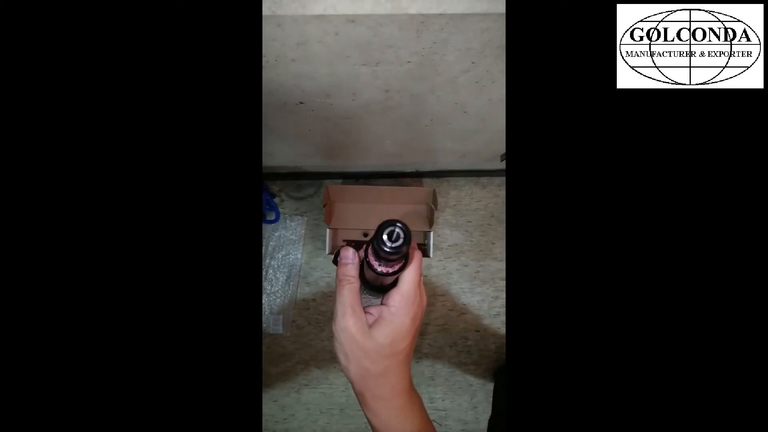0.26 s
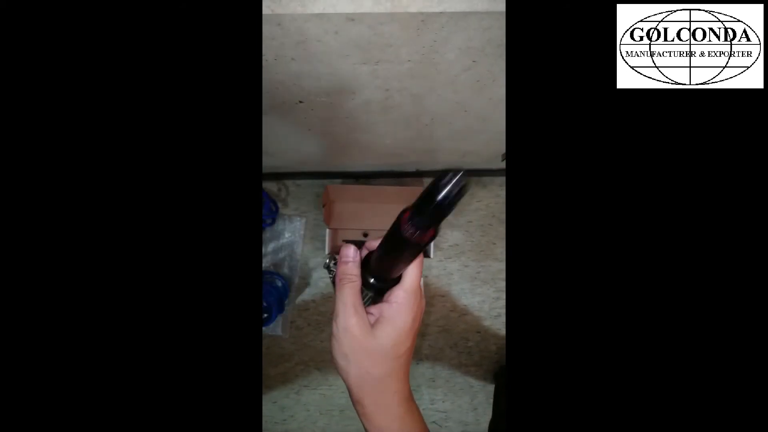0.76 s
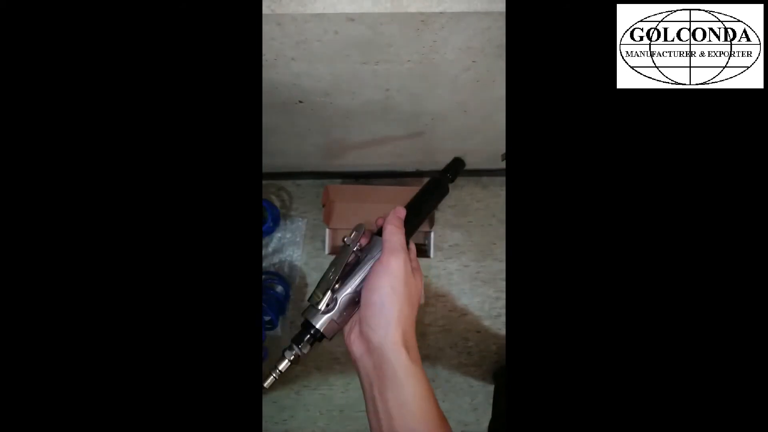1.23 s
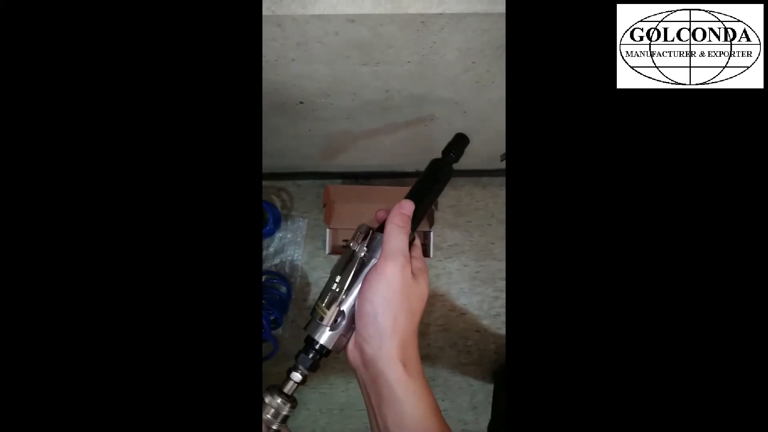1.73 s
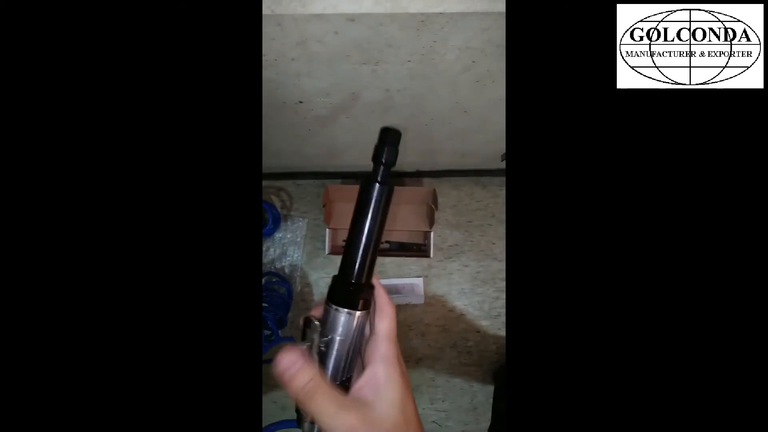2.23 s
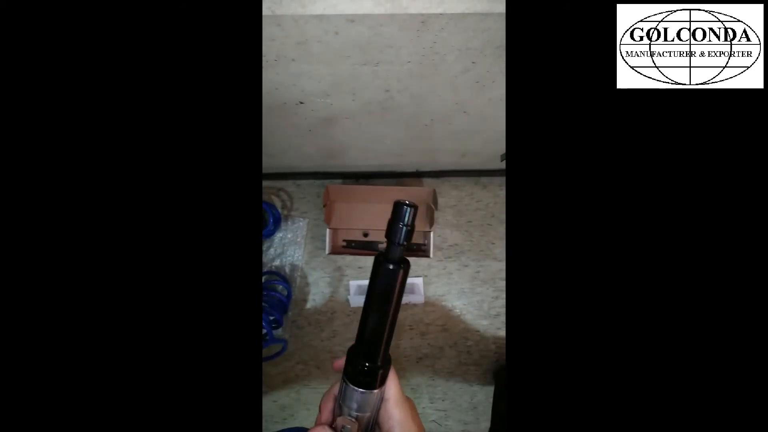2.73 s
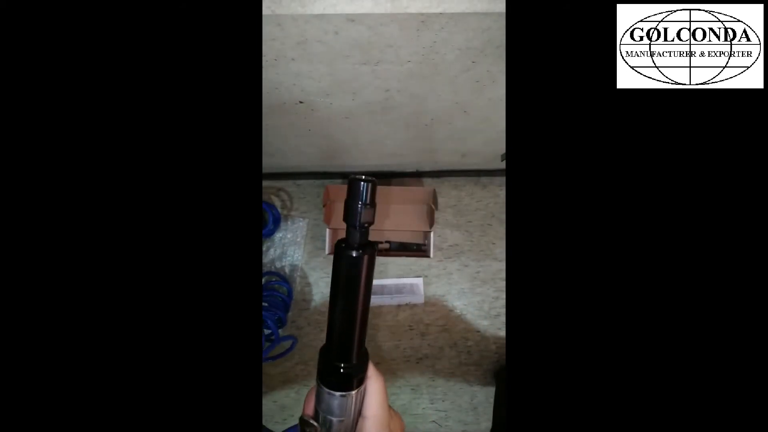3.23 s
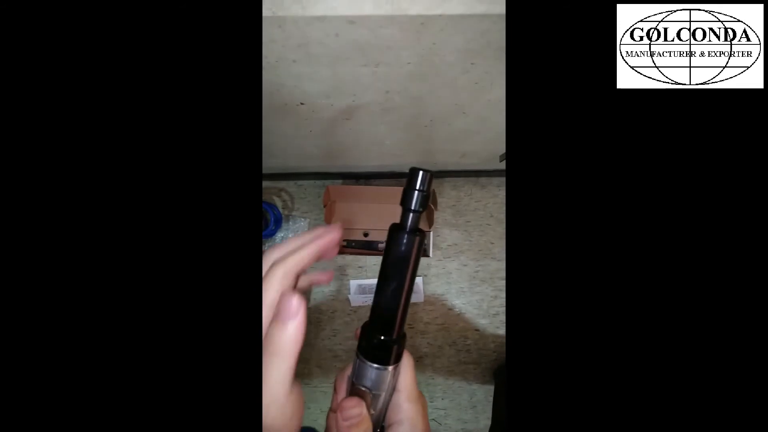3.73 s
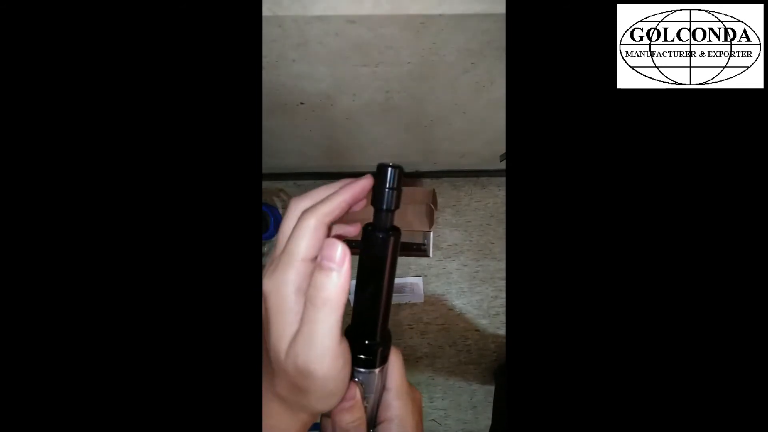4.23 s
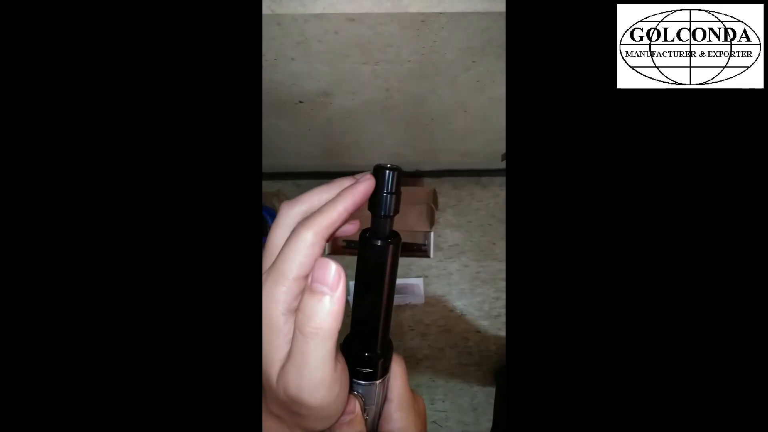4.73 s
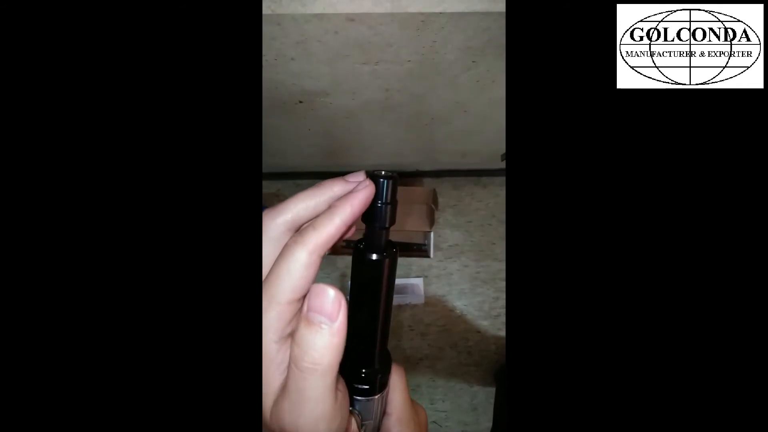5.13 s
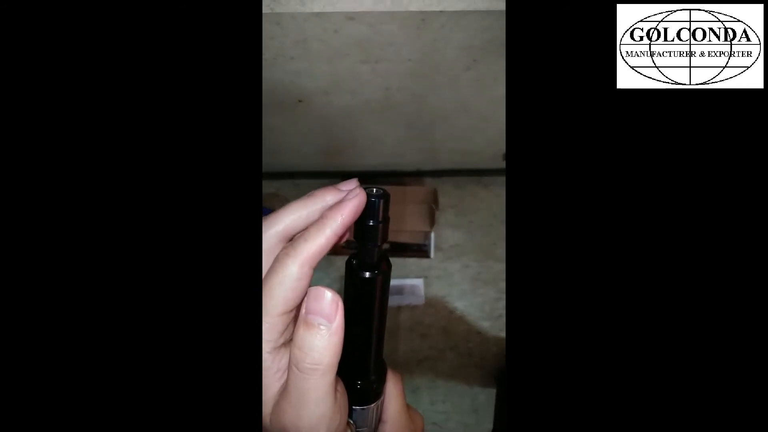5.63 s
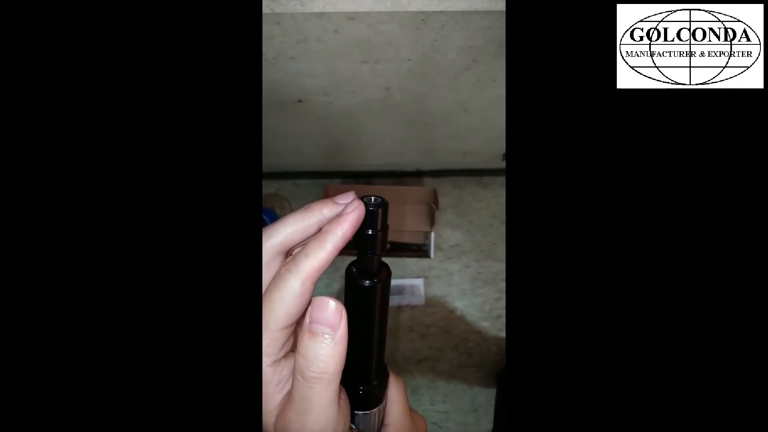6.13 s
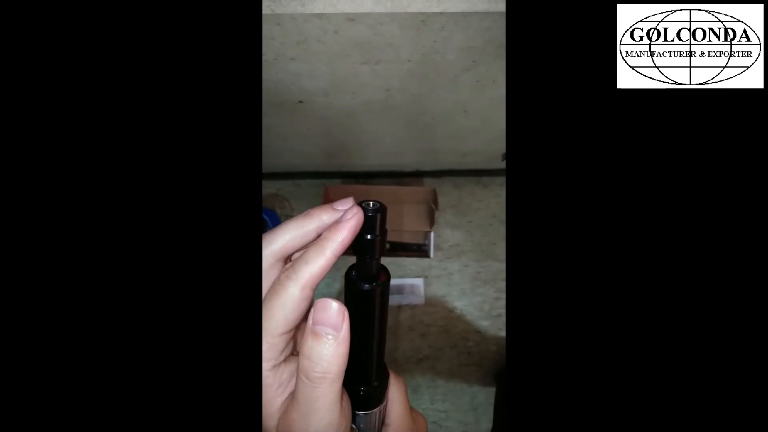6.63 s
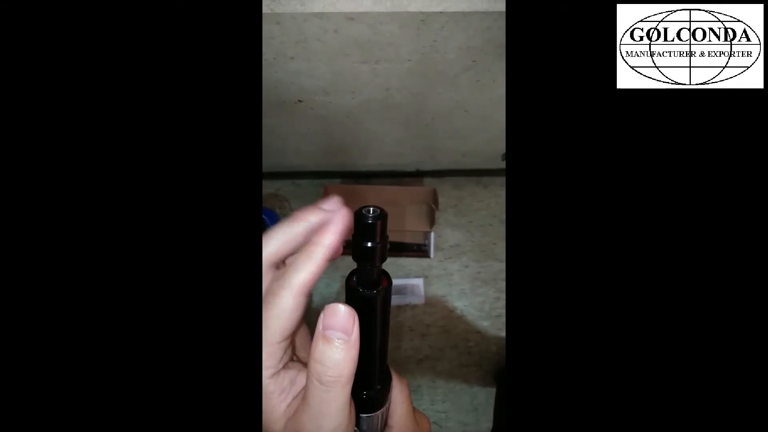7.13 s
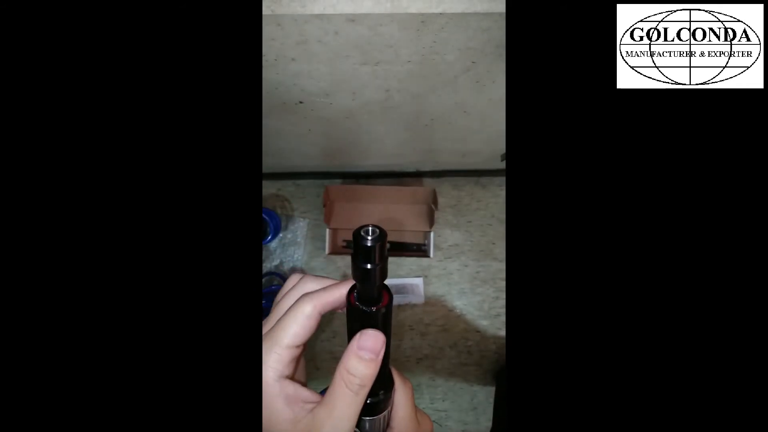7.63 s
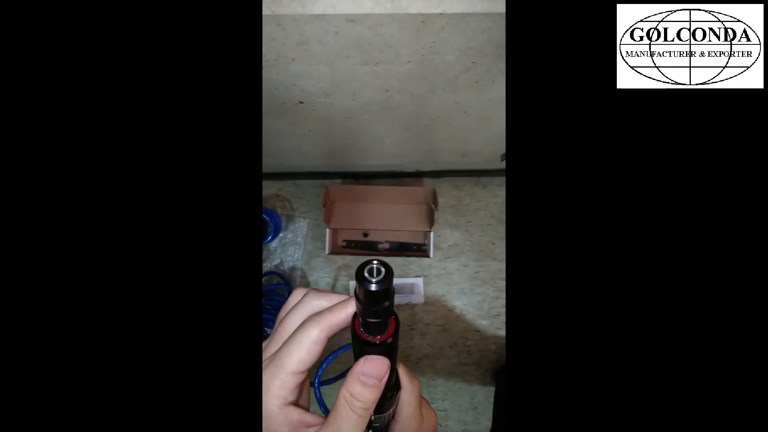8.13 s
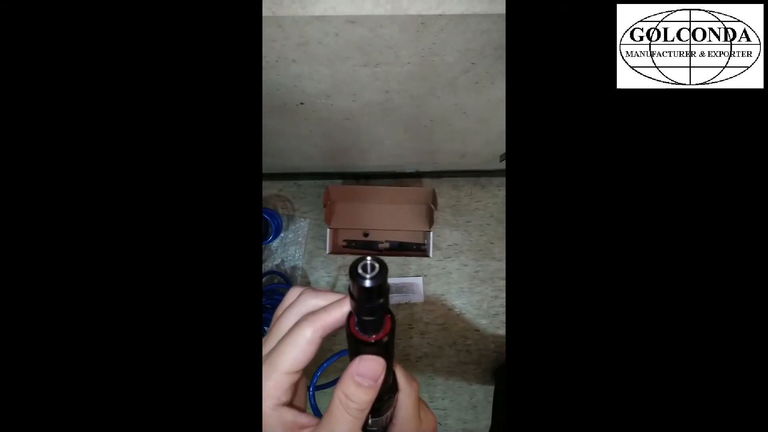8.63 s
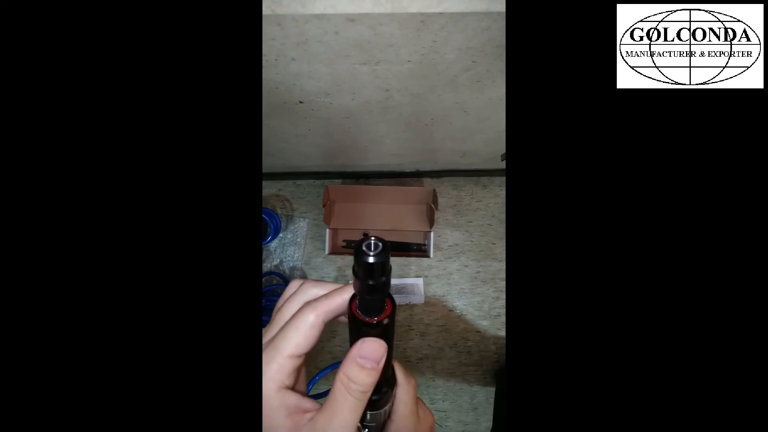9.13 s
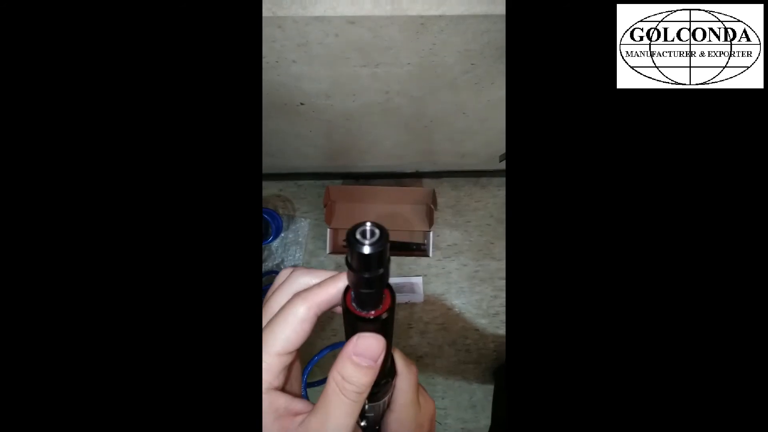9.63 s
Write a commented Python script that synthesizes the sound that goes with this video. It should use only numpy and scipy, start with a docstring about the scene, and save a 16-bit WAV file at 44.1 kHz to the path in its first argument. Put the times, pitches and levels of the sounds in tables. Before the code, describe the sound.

Close stereo pickup in a small, softly humming workshop. A steel air coupling scrapes and clicks while thin air hisses and squeals, then a brief blast vents as it seats. Smaller handling clicks and faint whistles follow. At about four seconds an air grinder puffs, races up within a fraction of a second and runs on with a wavering whine and strong exhaust hiss, mostly on the right.

```python
"""A small workshop with a low hum, an air hose and a die grinder close to two microphones.
A thin leak of air hisses, the coupling scrapes, clicks and squeals, then seats with a blast of air.
As the tool is turned, more slides, clicks and thin whistles follow: noise, struck resonances, gliding sines.
Then the throttle opens: exhaust hiss blows to the right, coloured noise pulsed by the vanes,
and a four-vane motor puffs, spins up and whines, its tones all locked to one shaft angle."""
import sys
import numpy as np
from scipy import signal
from scipy.fft import rfft, irfft, next_fast_len
from scipy.io import wavfile
from scipy.ndimage import uniform_filter1d

SR = 44100
rng = np.random.default_rng(int(sys.argv[2]) if len(sys.argv) > 2 else 0)


def unload_audio(sound):
    """Save the sound as a 16-bit wav file, at the path given as the first command line argument."""
    columns = np.transpose(np.atleast_2d(sound))
    # keep every value between -1 and 1, then stretch to whole-number steps
    steps = np.round(np.clip(columns, -1, 1) * 32767)
    wavfile.write(sys.argv[1], SR, steps.astype(np.int16))


N = 435266
T = np.arange(N) / SR


def amp(db):
    """Decibels to gain."""
    return 10 ** (np.asarray(db) / 20)


def unit(x):
    """Scales to rms 1."""
    return x / np.sqrt(np.mean(x ** 2) + 1e-20)


def curves(rows):
    """Each column of a timed table, sample by sample."""
    times, *columns = np.transpose(rows)
    return [np.interp(T, times, column) for column in columns]


def read(rows, hz):
    """Each column of a spectrum table at the given frequencies, on a log frequency axis."""
    table_hz, *columns = np.transpose(rows)
    return np.array([np.interp(np.log(hz + 1), np.log(table_hz + 1), column) for column in columns])


def drift(hz, count=1):
    """Slow random movement of rms 1, up to about hz."""
    step = 64  # samples between knots
    knots = rng.standard_normal((count, N // step + 2))
    lowpass = signal.butter(2, min(hz, SR / 256), fs=SR / step, output="sos")
    slow = signal.sosfilt(lowpass, knots)
    return np.array([np.interp(np.arange(N) / step, np.arange(len(k)), unit(k)) for k in slow])


def smooth_filter(x, order, hz, kind="low"):
    """Butterworth filter run once, forwards in time."""
    return signal.sosfilt(signal.butter(order, hz, kind, fs=SR, output="sos"), x)


def lowpass_in_step(x, hz):
    """Low-pass run both ways, so that the result stays in phase with its source."""
    return signal.sosfiltfilt(signal.butter(2, hz, fs=SR, output="sos"), x)


def air(colour, same_low, same_high):
    """Turbulent noise at two microphones, with their likeness below 9 kHz and above 11.8 kHz."""
    size = next_fast_len(N)
    hz = np.fft.rfftfreq(size, 1 / SR)
    a, b = rfft(rng.standard_normal((2, size)))
    same = np.clip(np.interp(hz, [9000, 11800], [same_low, same_high]), -1, 1)
    pair = np.array([same * a + np.sqrt(1 - same ** 2) * b, a])
    return irfft(pair * amp(read(colour, hz)), size)[:, :N]


def resonate(x, hz, width):
    """A damped resonance of gain 1 at its centre; the width is in Hz."""
    r = np.exp(-np.pi * width / SR)
    pole = r * np.exp(2j * np.pi * hz / SR)
    return 2 * signal.lfilter([1 - r], [1, -pole], x + 1e-18).real


# Decay of the workshop: (frequency [Hz], time to fall by 60 dB [s])
ROOM_DECAY = [(200, 0.067), (2000, 0.33), (8000, 0.19), (15000, 0.23)]


def room(x):
    """Dense reflections of the workshop: the bass dies first and the middle rings longest."""
    taps = rng.standard_normal((2, SR // 2))
    hz, t, z = signal.stft(taps, SR, nperseg=256)
    tail = signal.istft(z * amp(-60 * t / read(ROOM_DECAY, hz).T), SR, nperseg=256)[1]
    tail *= np.clip(T[:tail.shape[1]] / 0.002 - 1, 0, 1)  # silent for 2 ms, full at 4 ms
    return signal.oaconvolve(x, tail / np.linalg.norm(tail[0]), axes=1)[:, :N]


# Colour of the workshop's room noise: (frequency [Hz], left level [dB], right level [dB])
ROOM_TONE = [(22, -58, -51), (50, -42, -35), (85, -31, -24), (120, -32, -25), (170, -28, -21),
             (240, -35, -26), (310, -38, -31), (500, -44, -34), (1000, -49, -41.5), (1700, -55, -46.5),
             (2200, -76, -54), (3000, -84, -70), (6000, -88, -81), (15000, -95, -78)]
# Two distant machines hum almost in tune; their tones add up at the crest
HUM_HZ, HUM_CREST_S = (680.75, 682.38), 0.43


def workshop(hum_db=-58, room_db=1):
    """Low room noise with two faint machine tones, so close in pitch that they beat slowly."""
    hum = sum(np.cos(2 * np.pi * hz * (T - HUM_CREST_S)) for hz in HUM_HZ)
    hum = hum * amp(hum_db + 1.2 * drift(2.2)[0])
    noise = air(ROOM_TONE, 0.35, .3) * amp(room_db + .5 * drift(7)[0])
    return noise + hum * amp([[-14], [0]])


# Flow of the leak at the coupling: (time [s], level [dB])
LEAK_FLOW = [(0.1, -54), (0.3, -64), (0.68, -68), (0.85, -51), (1.55, -57), (2.05, -41.5), (2.35, -60),
             (2.7, -68.5), (3.95, -74.5)]
# Colour of the leak at the microphones: (frequency [Hz], left level [dB], right level [dB])
LEAK_COLOUR = [(2000, -48.5, -34.5), (7100, -41.5, -14), (11000, -21.5, 9.5), (11800, -17, 1.5),
               (15500, -21, -12.5)]
# Squeals of the leak, one curve each: (time [s], pitch [Hz], level [dB])
SQUEAL_SEATING = [(1.08, 11600, -45), (1.16, 11500, -46), (1.24, 11500, -44), (1.29, 12800, -46),
                  (1.36, 12450, -42), (1.42, 12150, -41), (1.49, 12050, -44), (1.56, 10900, -46),
                  (1.64, 10400, -43)]
SQUEAL_CHIRP = [(1.33, 5050, -64), (1.39, 5130, -56), (1.44, 5440, -61.5)]
SQUEAL_TURNING = [(3.39, 9400, -58), (3.46, 10870, -54), (3.52, 12100, -50), (3.6, 10800, -53.5),
                  (3.7, 9350, -55), (3.75, 9140, -61)]
SQUEAL_LAST = [(3.85, 3930, -64), (3.885, 4250, -67), (3.92, 4230, -70)]
# Partials that glide together in a squeal: (ratio to its pitch [1], level [dB])
PARTIALS_SEATING = [(1, 1), (1.115, -9)]
PARTIALS_TURNING = [(0.27, -21), (0.36, -22), (0.527, -8), (0.67, -17), (1, -3), (1.1, -9), (1.2, -1),
                    (1.34, 0), (1.6, -2)]
PARTIALS_LAST = [(1, 1), (1.09, 0.55)]


def leak(whistle_db=-1, puff_db=0):
    """A thread of air hisses at the coupling and squeals as the gap shifts."""
    tone, hiss = (
        squeal(SQUEAL_SEATING, PARTIALS_SEATING, hiss_db=-16, waver=0.002)
        + squeal(SQUEAL_CHIRP, [(0.97, 0)], hiss_db=-20, waver=0.008)
        + squeal(SQUEAL_TURNING, PARTIALS_TURNING, hiss_db=-2, waver=0.013, flutter=0.56, fading_db=5)
        + squeal(SQUEAL_LAST, PARTIALS_LAST, hiss_db=-12.0, waver=0.0152))
    whistle = amp(whistle_db) * tone * amp([[-7], [0]])
    flow = amp(curves(LEAK_FLOW)[0]) + amp(puff_db) * sliding()[1] + hiss
    noise = air(LEAK_COLOUR, .3, 0.53) * flow * amp(1.3 * drift(30)[0])
    return whistle + .5 * room(whistle) + noise


# The sleeve slides on the plug and lets out a puff:
# (time of peak [s], scrape level [dB], puff level [dB], rise time [s], fall time [s])
SCRAPES = [(0.475, -55.5, -48, 0.017, 0.042), (0.767, -33.5, -34, 0.02, 0.022),
           (0.85, -44, -60, 0.03, 0.04), (0.925, -44, -63, 0.045, 0.074), (1.2, -46, -54, 0.049, 0.054),
           (1.699, -12.5, -38, 0.021, 0.011), (2.133, -32, -53, 0.012, 0.01),
           (2.24, -50, -66, 0.0304, 0.053), (2.48, -55, -57, 0.029, 0.064), (2.94, -65, -55, 0.0097, 0.033),
           (3.09, -52, -70, 0.015, 0.085), (3.285, -58, -77, 0.018, 0.027),
           (3.455, -55, -57.5, 0.022, 0.07), (3.775, -59, -66, 0.015, 0.037)]


def sliding():
    """Strength of the scrape and of the puff of air: each slide swells to its peak and dies away."""
    scrape, puff = np.zeros((2, N))
    for s, scrape_db, puff_db, rise_s, fall_s in SCRAPES:
        swell = np.exp(-np.maximum((s - T) / rise_s, (T - s) / fall_s))
        scrape += amp(scrape_db) * swell
        puff += amp(puff_db) * swell
    return scrape, puff


# Metal clicks of coupling and lever:
# (time [s], level [dB], dullness [0-1], rattle time [s], ring of the struck spot [Hz])
CLICKS = [(1.034, -12.5, 0.21, 0.0033, 8900), (1.055, -24, 0.27, 0.003, 6200),
          (1.281, -13.5, 0.3, 0.002, 7900), (1.283, -5.5, 0.21, 0.0012, 11900),
          (1.5313, -20.5, 0.65, 0.0073, 4250), (1.54, -30, 1, 0.0089, 1150),
          (1.665, -12.5, 0.43, .0015, 11600), (1.681, -9, 0.6, 0.0013, 4400),
          (1.697, -8, 0.15, 0.0033, 7900), (1.9556, -8.5, 0.24, 0.0013, 11500),
          (2.132, -30, 1, 0.0072, 2140), (2.2427, -23.5, 0.3, 0.00065, 4330),
          (2.485, -36, 0.33, 0.0055, 10400), (2.936, -56.5, .4, 0.0034, 10400),
          (3.076, -36, 0.9, 0.0026, 4270), (3.1537, -38.5, 0.4, 0.0055, 7000)]
# Modes of the coupling: (frequency [Hz], width [Hz], level [dB])
COUPLING_MODES = [(900, 550, -3.5), (1510, 490, 3.5), (2190, 670, 7.5), (3090, 1450, 8.5), (4550, 1100, 9),
                  (5900, 790, -1), (7730, 740, 3.5), (8800, 760, 2), (10160, 130, 7.5), (10500, 210, 3),
                  (11600, 1200, 3), (14350, 1800, -6.5)]


def coupling(click_db=1, scrape_db=0, grain_db=4, spot_gain=1.8, spot_width_hz=170):
    """Short rattles and gritty sliding ring the steel coupling; dull knocks reach its low modes."""
    grit = amp(scrape_db + grain_db * drift(140)[0])
    scrape = sliding()[0] * grit * rng.standard_normal(N)
    bright, dull = scrape.copy(), 0.35 * scrape
    t = T[:SR // 16]
    for s, db, dullness, rattle_s, spot_hz in CLICKS:
        blow = amp(db + click_db) * np.exp(-t / rattle_s) * rng.standard_normal(len(t))
        blow = blow + spot_gain * resonate(blow, spot_hz, spot_width_hz)
        at = slice(round(s * SR), round(s * SR) + len(t))
        bright[at] += blow
        dull[at] += dullness * blow
    ring = np.zeros(N)
    for k, (hz, width, db) in enumerate(COUPLING_MODES):
        drive = dull if hz < 5000 else bright
        ring += (-1) ** k * amp(db) * resonate(drive, hz, width)  # neighbours in opposite phase
    ring = smooth_filter(ring, 2, 450, "high")
    return ring * amp([[-24], [0]]) + room(ring * amp([[-13], [-6]]))


def squeal(rows, partials, hiss_db, waver, flutter=0.3, fading_db=2.0):
    """Unsteady partials of the gap glide together; gives the tone and the strength of its hiss."""
    hz, db = uniform_filter1d(np.array(curves(rows)), size=1800, axis=1)
    start_s, end_s = rows[0][0], rows[-1][0]
    level = amp(db) * np.clip(np.minimum(T - start_s, end_s - T) / .012, 0, 1)
    tone = np.zeros(N)
    for ratio, partial_db in partials:
        pitch_gust, level_gust = drift(170, count=2)
        strength = amp(partial_db + fading_db * drift(14)[0]) * (0.5 + flutter * level_gust)
        turns = np.cumsum(ratio * hz * (1 + waver * pitch_gust)) / SR
        tone += strength * np.sin(2 * np.pi * turns)
    return level * np.array([tone, np.full(N, amp(hiss_db))])


# Air escaping while the plug seats: (time [s], rush level [dB], hiss level [dB])
SEATING = [(1.794, -64, -59), (1.802, -4.5, 1.5), (1.85, -2, 2.5), (1.895, -2, 2), (1.92, -26.5, 3.5),
           (1.95, -23, -6), (2.0, -32, -16), (2.08, -60, -53)]
# Colour of the blast at the microphones: (frequency [Hz], left level [dB], right level [dB])
BLAST_COLOUR = [(39.8, -43.5, -23), (150.6, -39, -13.5), (407, -43, -13.5), (900, -42, -13.5),
                (2000, -32.5, -14.5), (4500, -28, -16), (7500, -27.5, -16.5), (9940, -31, -12.5),
                (11800, -12, -7.5), (15370, -21.5, -20.5)]


def seating_blast():
    """Line pressure vents past the plug until the seal closes; the low rush stops before the hiss."""
    rush_db, hiss_db = curves(SEATING)
    noise = air(BLAST_COLOUR, .1, 0.87)
    rush = lowpass_in_step(noise, 7000)
    hiss = noise - rush
    venting = (T > SEATING[0][0]) * (T < SEATING[-1][0])
    return (rush * amp(rush_db) + hiss * amp(hiss_db)) * venting


THROTTLE_S = 4.025
VANE_HZ = 1358  # vane passages per second, before overspeed and wander
# Pressure stored in the hose overspeeds the rotor, holds briefly, then drains away
OVERSPEED_HZ, HOLD_S, DRAIN_S = 167, 0.333, 0.55
HOUSING_HZ, HOUSING_WIDTH_HZ = 3440, 700  # resonance of the motor housing


def spin():
    """Share of full speed: the rotor breaks loose, races up and levels off."""
    return np.tanh((np.maximum(T - THROTTLE_S, 0) / .103) ** 1.12)


def surplus():
    """Share of the hose's stored pressure that is still left."""
    return np.exp(-np.maximum(T - THROTTLE_S - HOLD_S, 0) / DRAIN_S)


# Slow wander of the vane rate: (time [s], offset [Hz])
WANDER = [(4.36, 2), (4.8, 0), (4.98, -7), (5.59, 4), (6.54, -5), (7.08, -1), (7.41, 13), (8.17, 3),
          (9.08, 1), (9.15, -5.5)]


def shaft_turns(jitter=0.00136, stumble=0.0601):
    """Shaft angle in turns; four vanes pass the port in each, unevenly until flung out to seal."""
    full_hz = VANE_HZ + OVERSPEED_HZ * surplus() + curves(WANDER)[0]
    unevenness = jitter * drift(30.2)[0] + stumble * (1 - spin() ** 2) * drift(140)[0]
    vane_hz = full_hz * spin() * (1 + unevenness)
    return np.cumsum(vane_hz) / 4 / SR


# How far the hiss swells and sinks in patches: (frequency [Hz], left swing [dB], right swing [dB])
PATCHINESS = [(300, 3.3, 0.6), (2000, 3.2, 1.4), (3200, 3.5, 3), (6500, 3.5, 3), (9000, 2.2, 1.5),
              (12000, 0.6, 0.6)]


def patches(x, bins=4, frames=11):
    """Coarse hiss: patches a few hundred hertz wide and under a tenth of a second swell and sink."""
    hz, t, z = signal.stft(x, SR, nperseg=512)
    field = uniform_filter1d(rng.standard_normal(z.shape), bins, axis=1)
    field = unit(uniform_filter1d(field, frames, axis=2))
    gain = amp(read(PATCHINESS, hz)[:, :, None] * np.minimum(field, 1.5))
    gain = gain / np.sqrt(np.mean(gain ** 2, axis=2, keepdims=True))  # keeps the overall colour
    return signal.istft(z * gain, SR, nperseg=512)[1][:, :N]


def near_echoes(x, share, count=14, sway_s=0.00004):
    """Hand and tool body are small: they throw back only treble, its ripple shifting as they move."""
    delays = rng.uniform(0.000512, .006, (count, 1)) + sway_s * drift(0.7, count=count)
    signs = rng.choice([-1, 1], count)
    treble = smooth_filter(x, 2, 3000, "high")
    fine = signal.resample_poly(treble, 8, 1, axis=1)  # finer time steps for the moving delays
    places = np.round((T - delays) * SR * 8).astype(int)
    echoes = sum(sign * np.take(fine, at, axis=1, mode="clip") for at, sign in zip(places, signs))
    return x + share * echoes


# Exhaust flow: (time [s], level [dB])
FLOW = [(4.04, -20), (4.13, -14), (4.8, -14), (9.85, -14.5)]
# Colour of the exhaust jet at the microphones: (frequency [Hz], left level [dB], right level [dB])
JET_COLOUR = [(25, -66, -62), (94, -56, -20), (182, -56, -23), (308, -80, -17.5), (746, -50, -17.5),
              (1420, -31, -17), (3030, -27, -16), (5100, -29.5, -15.5), (6640, -27.5, -14),
              (9400, -27, -10), (10180, -25, -6), (10700, -19.5, -6), (11670, -9.5, -5), (15600, -12, -11),
              (16500, -33, -38)]


def exhaust(turns, jet_db=16, pulsing=0.022, flicker_db=0.33, buffet=0.23):
    """The jet hisses as the valve opens, pulses with each vane and buffets the microphones' bass."""
    valve = np.clip((T - THROTTLE_S + 0.0056) / 0.027, 0, 1) ** 2
    flow = amp(curves(FLOW)[0] + jet_db + flicker_db * drift(20)[0])
    jet = patches(near_echoes(air(JET_COLOUR, .05, .96), .11))
    jet = jet + buffet * drift(32)[0] * lowpass_in_step(jet, 1300)
    return jet * valve * flow * (1 + pulsing * np.cos(8 * np.pi * turns))


def start_chuff(turns, chuff_db=-21, thump_db=-22, thump_hz=280, thump_s=0.008,
                ping_db=-30, ping_s=0.0038, regular=0.59):
    """The valve thumps and pings the housing; chambers of the slow rotor dump ragged puffs through it."""
    since = np.maximum(T - THROTTLE_S, 0)
    puffs = np.exp(-(4 * turns % 1) * 4)  # one sharp onset for each vane
    slip = (1 - spin() ** 2) ** .6 * np.clip(since / 0.016, 0, 1)
    drive = puffs * (rng.standard_normal((2, N)) + regular) * amp(3.2 * drift(70)[0])
    housing = resonate(drive, 1050, 1350)
    housing = housing + 1.6 * resonate(drive, HOUSING_HZ, HOUSING_WIDTH_HZ)
    housing = housing + 0.63 * resonate(drive, 5200, 1800)
    chuff = slip * amp(chuff_db) * unit(smooth_filter(housing, 2, 130, "high"))

    def knock(hz, peak_s):
        """A tone that swells to its peak and dies away."""
        return since / peak_s * np.exp(1 - since / peak_s) * np.sin(2 * np.pi * hz * since)

    thump = amp([[-7], [0]]) * amp(thump_db) * knock(thump_hz, thump_s)
    return chuff + thump + amp(ping_db) * knock(HOUSING_HZ, ping_s)


# Vane tone at the microphones as hand and tool move, then its octave:
# (time [s], left level [dB], right level [dB], lead of the left [rad])
VANE_TONE = [(4.12, -28, -42, 0.8), (4.34, -47, -33.5, 1.5), (4.56, -32.5, -42, 1), (4.7, -36.5, -31, 1.5),
             (4.85, -29.5, -42, -2.5), (4.99, -45, -34, 0), (5.1, -33, -28.5, 0.8),
             (5.57, -29.5, -32.5, 0.7), (5.72, -33, -44, 1), (5.97, -30.5, -29, 4), (6.38, -37.5, -27, 2),
             (7.1, -38, -29, 1.5), (7.42, -37, -37, 3.5), (7.86, -43.6, -30.5, 4), (8.47, -53, -29.5, 5.5),
             (9.05, -47, -28, 6.7), (9.16, -36, -32, 6.5), (9.83, -36, -29, 7.5)]
OCTAVE = [(4.16, -34, -33, -8.5), (4.34, -34, -20.5, -8.5), (4.49, -35.6, -28.5, -8.4),
          (4.52, -34, -29, -10.5), (4.67, -29, -23.5, -11.5), (5.0, -38.5, -29, -5.5), (5.32, -42, -24, -5),
          (5.5, -34.5, -35, -2.5), (5.79, -44, -36, 0), (6.05, -44, -40, -4.5), (6.56, -33.5, -43, -2),
          (7.54, -44, -32.5, -3), (7.75, -56, -33, -6), (8.22, -39.6, -33.5, -4.5), (8.48, -38, -44, -3),
          (8.7, -40, -33, -2.5), (9.0, -43, -37, -1.5), (9.25, -39, -28, -1.3), (9.84, -46, -51, -2)]
# Its third and fourth harmonics: (time [s], left level [dB], right level [dB])
THIRD = [(4.16, -37, -30), (4.25, -28, -20), (4.38, -36, -24), (4.89, -45, -36), (5.03, -47, -40),
         (5.72, -51, -37), (6.37, -49, -46), (7.17, -50, -44), (7.5, -60, -39), (7.61, -49, -52),
         (8.04, -40, -50), (8.15, -51, -43), (8.91, -55, -37), (9.17, -45, -40), (9.84, -47, -38)]
FOURTH = [(4.16, -33, -36), (4.23, -28, -29), (4.34, -35, -37), (4.6, -29, -30.5), (4.71, -31, -32),
          (4.81, -46, -30), (5.75, -36, -34), (6.08, -39, -42), (6.85, -44, -37), (7.03, -49, -33),
          (7.21, -39, -40), (7.32, -43, -34), (7.75, -37, -40), (8.88, -39, -39), (9.3, -35, -32),
          (9.84, -43, -38)]


def vane_tones(turns, tone_db=8.5, flutter=0.12, fading_db=1.0, sway=1.18,
               start_rough=1.3, housing_gain=3.2):
    """Vanes chop the air like a siren, ragged at first; four harmonics swell and sink as the tool moves."""
    out, speed = np.zeros((2, N)), spin()
    slip = 1 - speed ** 2
    for k, rows in enumerate([VANE_TONE, OCTAVE, THIRD, FOURTH], 1):
        left_db, right_db, *lead = curves(rows)
        # higher harmonics flicker more
        gust = k * flutter * drift(18, count=2) + start_rough * slip * drift(120, count=2)
        angle = 8 * np.pi * k * turns + gust[::-1]
        angle[0] += lead[0] if lead else sway * drift(0.76)[0]
        level_db = np.array([left_db, right_db]) + (k - 1) * fading_db * drift(5.9, count=2)
        # each harmonic flares as it sweeps through the housing's resonance
        detune = 2 * (k * (VANE_HZ + OVERSPEED_HZ) * speed - HOUSING_HZ) / HOUSING_WIDTH_HZ
        flare = 1 + housing_gain * slip / (1 + detune ** 2)
        out += amp(level_db) * flare * (1 + gust) * np.cos(angle) * speed ** (k + 1)
    return amp(tone_db) * out


def vane_rasp(turns, left_db=-35, right_db=-41, width_hz=380):
    """Turbulence smears the fourth vane harmonic into a rasping band that follows the speed."""
    rough = unit(smooth_filter(rng.standard_normal((2, N)), 4, width_hz))
    level = amp(np.array([[left_db], [right_db]]) + 2 * drift(9, count=2))
    return level * rough * np.sqrt(2) * np.cos(32 * np.pi * turns) * spin() ** 4


# Faint lines of the motor: (multiple of the shaft rate [1], left level [dB], right level [dB])
ORDERS = [(1, -54, -56), (7, -52, -44), (9, -49, -40), (10, -48, -46), (11, -44, -38), (13, -41, -36),
          (14, -49, -38), (17, -48, -36), (18, -51, -41), (20, -49, -37), (24, -53, -45), (28, -56, -45),
          (30, -50, -31), (31, -40, -32), (32, -47, -33), (36, -39, -34), (40, -38, -34), (42, -34, -31),
          (44, -41, -36)]


def whine(turns, flutter=0.22, sideband_db=0, upper_db=8, fading_db=3, fifth_push_db=6):
    """Faint lines in the hiss: the top vane harmonics, and shaft orders from uneven vanes."""
    out = np.zeros((2, N))
    for order, *pair_db in ORDERS:
        shake = flutter * np.sqrt(order / 8)  # turbulence shakes the high lines most
        gust = drift(13.5, count=2)
        level_db = (sideband_db if order % 4 else upper_db) + fading_db * drift(2.7, count=2)
        if order in (20, 28):  # fifth and seventh vane harmonics shrill while pressure is high
            level_db = level_db + fifth_push_db * surplus() ** 2
        line = np.cos(2 * np.pi * order * turns + shake * gust[::-1])
        out += amp(np.array(pair_db)[:, None] + level_db) * (1 + shake * gust) * line
    return out * spin() ** 10


def scene():
    """All sources at the two microphones, with the room's answer."""
    turns = shaft_turns()
    escaping = seating_blast() + leak()
    escaping = escaping + amp(-11.0) * room(escaping)
    motor = start_chuff(turns) + vane_tones(turns) + vane_rasp(turns) + whine(turns)
    motor = motor + amp(-19) * room(motor)
    return workshop() + escaping + coupling() + exhaust(turns) + motor


# Gain control: threshold, dB turned down for each dB above it, time constant
AGC_FROM_DB, AGC_SHARE, AGC_S = -23, 0.45, 0.12
EDGE_HZ = 15800  # upper band limit


def record(dry):
    """Gain control turns loud air down, and the room with it; then a soft ceiling and the band limit."""
    step = 1 / (AGC_S * SR)
    power = signal.lfilter([step], [1, step - 1], (dry ** 2).mean(0))
    excess_db = np.maximum(10 * np.log10(power + 1e-12) - AGC_FROM_DB, 0)
    ducked = dry / amp(AGC_SHARE * excess_db)
    limited = ducked / (1 + (ducked / .8) ** 6) ** (1 / 6)
    band = signal.firwin(801, EDGE_HZ, window=("kaiser", 8), fs=SR)
    return signal.oaconvolve(limited, band[None], "same")


dry = scene()
out = record(dry)
unload_audio(out)
```